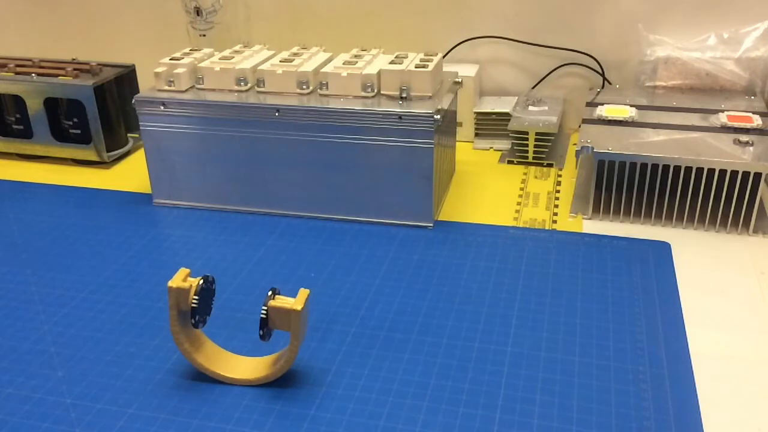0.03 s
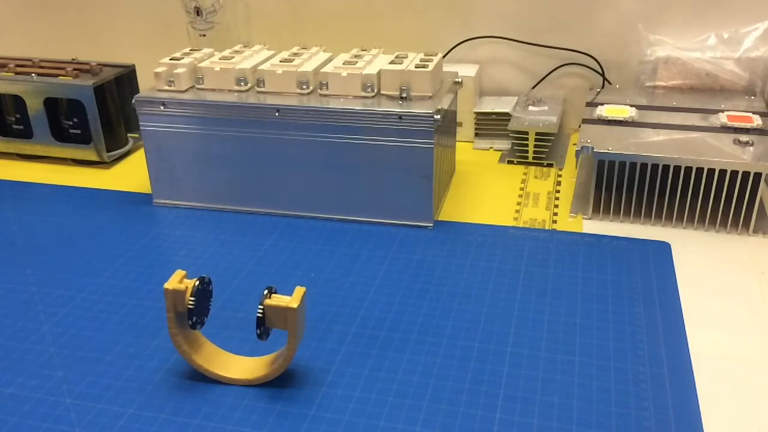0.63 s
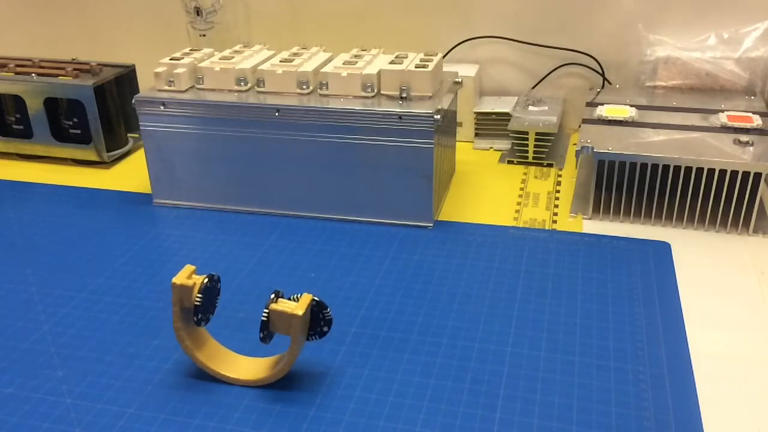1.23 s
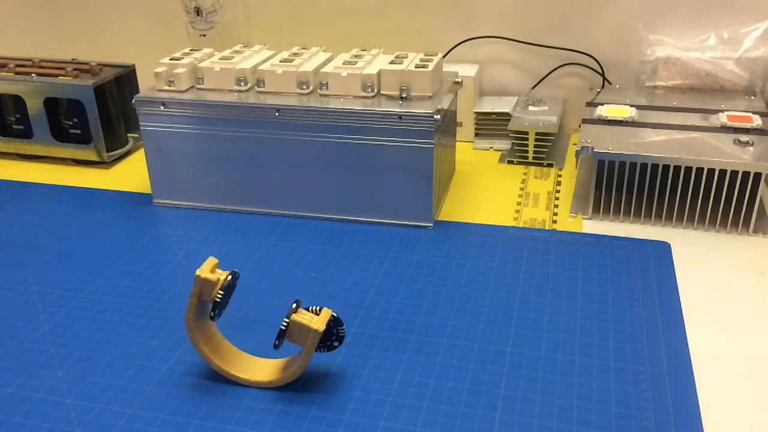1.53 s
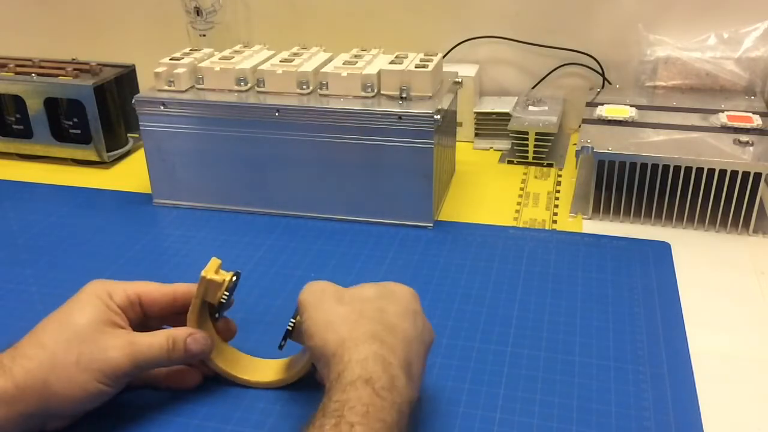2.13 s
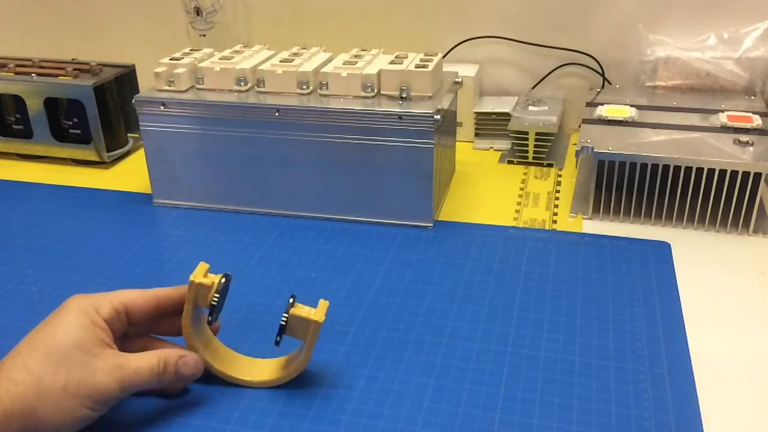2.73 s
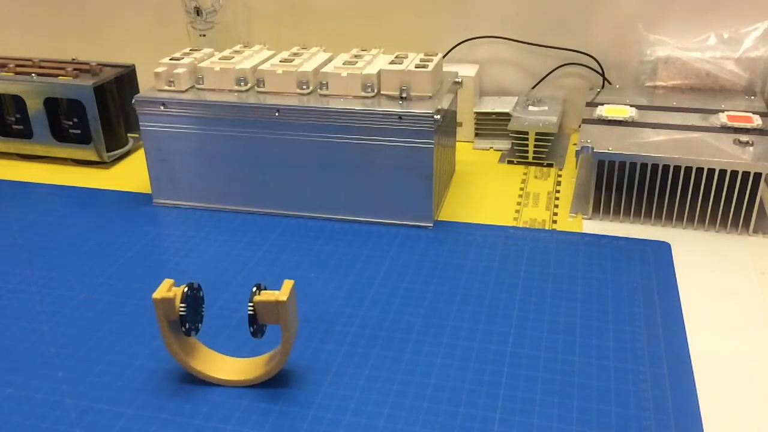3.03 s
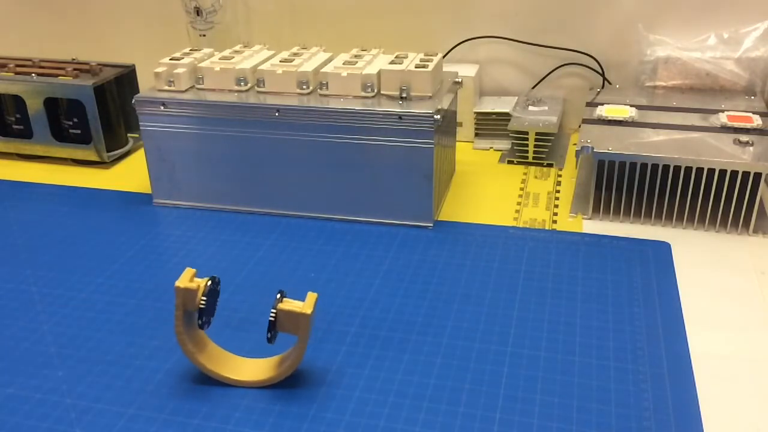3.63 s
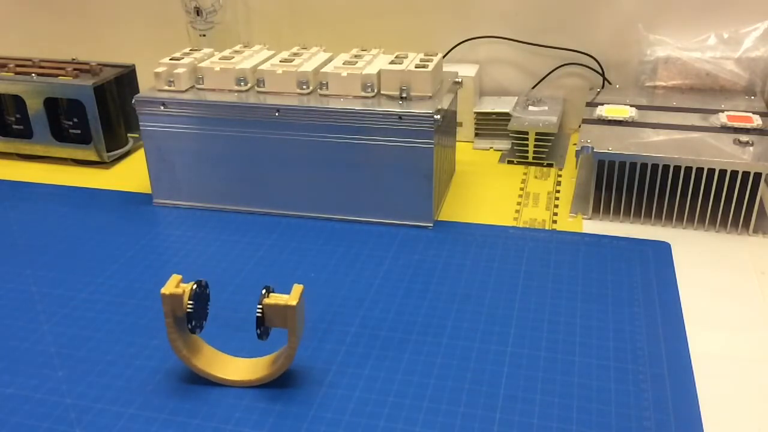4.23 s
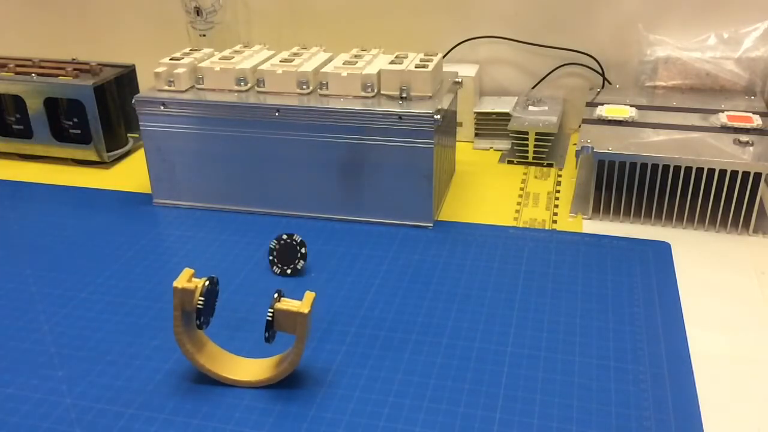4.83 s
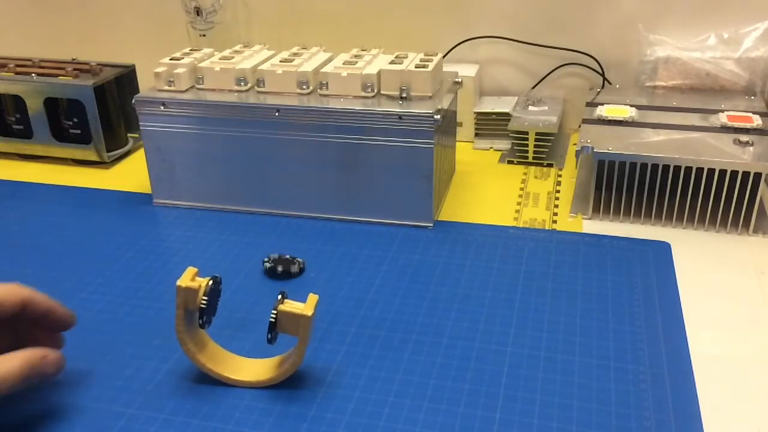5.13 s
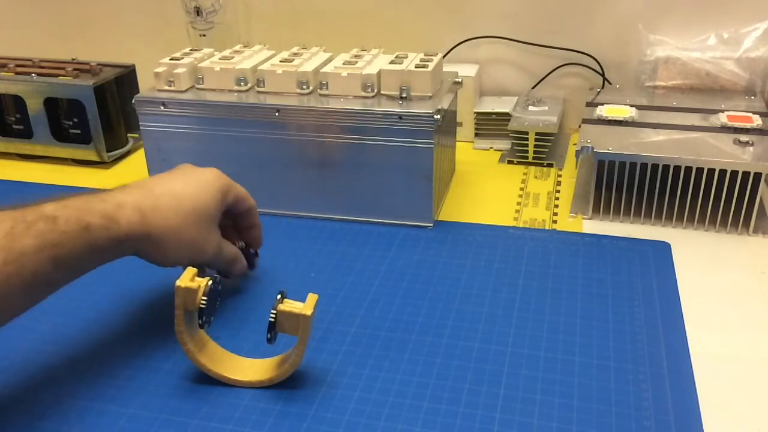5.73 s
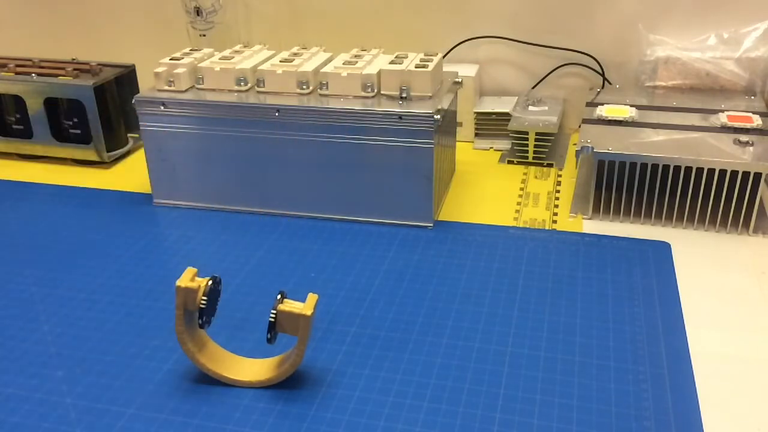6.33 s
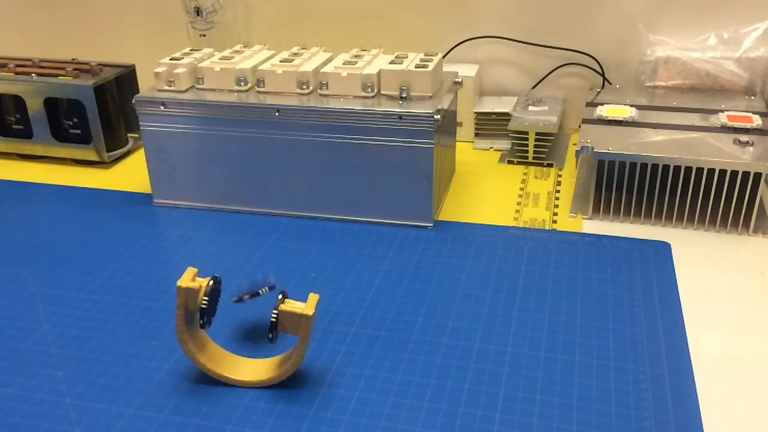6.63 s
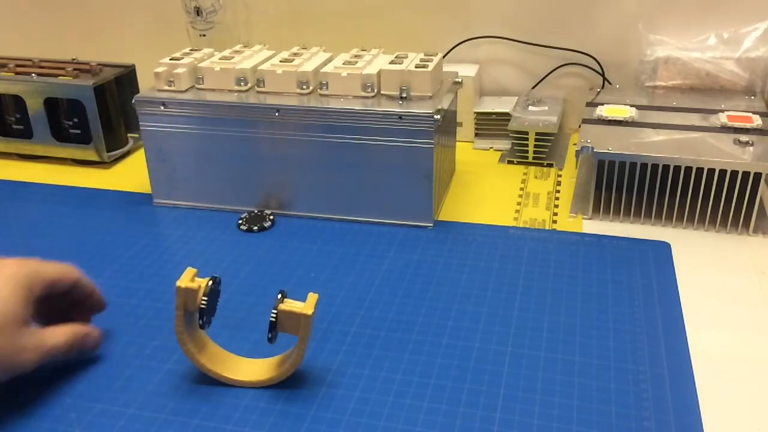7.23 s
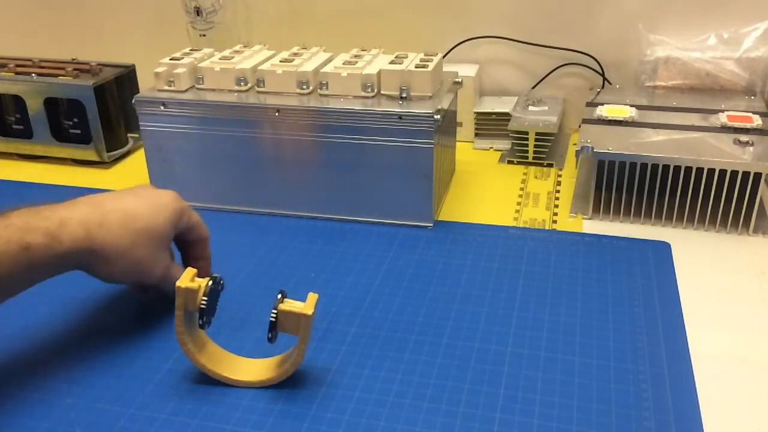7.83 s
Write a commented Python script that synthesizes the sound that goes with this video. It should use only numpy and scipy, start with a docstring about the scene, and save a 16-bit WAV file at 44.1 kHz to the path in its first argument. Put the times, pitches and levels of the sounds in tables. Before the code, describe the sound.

A faint electric buzz and hum fill a small room, heard from close to a workbench. At about 1 second a hard plastic chip cracks against a magnet, its holder knocks on the bench, and the chip chatters quickly before snapping on with a tiny ping. Soft sleeve rustles come near 1.9 and 2.9 seconds, with a couple of light, dull bumps between them. At 4.7 seconds a second chip clacks sharply, bounces and wobbles like a coin on the mat, its rim ticking faster until a click and knock at about 5.6. At 6.7 seconds a third chip cracks against the magnet with a brief ping, bounces with loud knocks and strikes a metal case near 7 seconds, which rings shortly. The chip wobbles and taps the case again more lightly, then slides quietly over the mat from about 7.7 seconds.

```python
"""Sharp clacks, knocks and wobbles over a faint electric buzz, in a small room.
Poker chips, tossed at a strong magnet in a curved plastic holder, crack against it and rock the
holder on the bench. They bounce and wobble like coins on the bench mat; one rings a metal case.
Sleeves rustle softly as hands fetch the chips back."""
import sys
import numpy as np
from scipy import signal
from scipy.fft import irfft
from scipy.io import wavfile
from scipy.ndimage import uniform_filter1d, minimum_filter1d

SR = 44100
rng = np.random.default_rng(int(sys.argv[2]) if len(sys.argv) > 2 else 0)


def persist_wave(psi):
    """Save psi, clipped to +-1, as 16-bit WAV."""
    counts = np.round(np.clip(psi, -1, 1) * 32767).astype(np.int16)
    wavfile.write(sys.argv[1], SR, np.atleast_2d(counts).T)


N = 348390
TIME_S = np.arange(N) / SR
RING_S = TIME_S[:SR * 3 // 4]  # time axis of one decay

# Table levels are relative; each source adds its own gain.
CHIP_MODES = [(1424, -7.5, 0.034), (3105, -6, 0.031), (3190, 3, 0.013), (3470, -4, 0.039),
              (5930, -21, 0.057)]  # disc: f/Hz, level/dB, t60/s
BENCH_MODES = [(104, -5, .14), (124, -9, .12), (171.2, -6, .16), (235, -4, .06), (295.2, -1, .08),
               (344, -.5, .1), (385, 1.5, .08)]  # bench top: f/Hz, level/dB, t60/s
RIM_TICK_SPECTRUM = [(200, -19.5), (1500, 10.5), (3700, -10), (5200, -4.5), (6800, -15.5), (8500, -31.5),
                     (15000, -38.5)]  # rim catching on the mat: f/Hz, level/dB


def amp(db):
    """Decibels to gain."""
    return 10 ** (np.asarray(db) / 20)


def unit(x):
    """Scale to energy 1."""
    return x / np.sqrt(np.sum(x ** 2) + 1e-20)


def lookup(points, hz):
    """Interpolate a table over log frequency."""
    table_hz, value = np.transpose(points)
    return np.interp(np.log(hz + 1), np.log(table_hz), value)


def add(mix, s, sound):
    """Mix a sound in at time s."""
    part = mix[round(s * SR):][:len(sound)]
    part += sound[:len(part)]


def pulse(spectrum, tilt_db_oct=0, cut_hz=SR, order=5, size=4096):
    """Minimum-phase click; a soft contact cuts the treble down to a faint tick."""
    hz = abs(np.fft.fftfreq(size, 1 / SR))
    lowpass = 1 / np.hypot(1, (hz / cut_hz) ** order) + amp(-28.5)
    treble_db = tilt_db_oct * np.log2(np.hypot(hz, 2500) / 4000)
    log_gain = np.log(lowpass * amp(lookup(spectrum, hz) + treble_db))
    return np.fft.ifft(np.exp(np.conj(signal.hilbert(log_gain)))).real[:size // 2]


def colour(x, spectrum):
    """Filter by a spectrum, keeping the power of white noise."""
    return signal.oaconvolve(x, unit(pulse(spectrum)))[:len(x)]


def ring(modes, detune=0., uneven_db=0.):
    """Decaying modes; each blow lands on another spot and weights them anew."""
    out = np.zeros(len(RING_S))
    for k, (hz, db, t60_s) in enumerate(modes):
        weight, shift = rng.standard_normal(2)
        envelope = amp(db + uneven_db * weight - 60 * RING_S / t60_s)
        out += (-1) ** k * envelope * np.sin(2 * np.pi * hz * (1 + detune * shift) * RING_S)
    return out


def scatter(start_s, t60_s):
    """Dense decaying reflections, energy 1."""
    return unit(rng.standard_normal(len(RING_S)) * amp(-60 * RING_S / t60_s) * (RING_S > start_s))


def room_tail():
    """Diffuse echoes, each band decaying at its own rate."""
    decay = [(100, 0.34), (1500, 0.26), (4000, 0.25), (7000, 0.25), (12000, 0.059)]  # reverberation: f/Hz, t60/s
    hz, s, noise = signal.stft(rng.standard_normal(len(RING_S)), SR, nperseg=256)
    envelope = amp(-60 * s / lookup(decay, hz)[:, None])
    tail = signal.istft(noise * envelope, SR, nperseg=256)[1][:len(RING_S)]
    return unit(tail * np.clip((RING_S - .005) / .0032, 0, 1))


def space(room_db, near_db, near_t60_s):
    """Direct sound, quick echoes from gear on the bench, then the room."""
    near = amp(near_db) * scatter(.00027, near_t60_s)
    return signal.unit_impulse(len(RING_S)) + near + amp(room_db) * room_tail()


def swells(rows):
    """Sum of Gaussian envelopes."""
    return sum(amp(db) * np.exp(-.5 * ((TIME_S - s) / sigma_s) ** 2) for s, sigma_s, db in rows)


def grains(per_s, spread_db):
    """Tiny random slips of uneven size, rms 1."""
    size = amp(spread_db * np.minimum(rng.exponential(1, N), 3)) * rng.choice([-1, 1], N)
    return np.sqrt(N) * unit(size * (rng.random(N) < per_s / SR))


def click_train(first_s, period_s, jitter_s, uneven_db):
    """Nearly regular clicks of uneven size, rms 1."""
    out, s = np.zeros(N), np.arange(first_s, N / SR, period_s)
    late, size = rng.standard_normal((len(s), 2)).T
    out[np.clip((s + jitter_s * late) * SR, 0, N - 1).astype(int)] = amp(uneven_db * size)
    return np.sqrt(N) * unit(out)


def background():
    """Room air, mains hum, a sizzling power supply and the faint tick of a wireless beacon."""
    air_spectrum = [(20, -7.5), (55, 11.5), (130, 9.5), (500, -0.5), (900, -5.5), (2000, -7.5),
                    (4500, -4.5), (8000, -14), (15500, -18)]  # f/Hz, level/dB
    hum_partials = [(59.2, -75), (118.4, -80.5)]  # f/Hz, rms level/dB
    buzz_spectrum = [(500, -30.5), (2100, -21), (2700, -8.5), (3040, 2), (3300, -4), (6000, -22.5),
                     (12000, -31.5)]  # f/Hz, level/dB
    tick_spectrum = [(500, -17), (2500, -7), (4200, 6), (6500, -6.5), (15000, -20)]  # f/Hz, level/dB
    air = amp(-70.5) * colour(rng.standard_normal(N), air_spectrum)
    hum = sum(amp(db) * np.sqrt(2) * np.sin(2 * np.pi * hz * TIME_S) for hz, db in hum_partials)
    sparks = click_train(first_s=0, period_s=1 / 240, jitter_s=.0005, uneven_db=1.4)
    sparks *= 1 + .56 * np.cos(2 * np.pi * 120 * TIME_S)  # alternately strong and weak
    buzz = colour(amp(-70) * sparks + amp(-78) * rng.standard_normal(N), buzz_spectrum)
    beacon = click_train(first_s=.0558, period_s=.1024, jitter_s=0, uneven_db=2.6)
    return air + hum + buzz + amp(-77) * colour(beacon, tick_spectrum)


def contacts(s, db, tilt_db_oct, edge_lead_s):
    """A tilted chip touches edge first, slaps flat, then chatters; a nearly flat one only slaps."""
    slap = (s, db, tilt_db_oct)
    if edge_lead_s < .003:
        return [slap]
    dull_db_oct = tilt_db_oct - 4
    edge = (s - edge_lead_s, db - 10.5, dull_db_oct)
    chatter = (s + .0026, db - 1, dull_db_oct)
    return [slap, edge, chatter]


def clacks():
    """A chip hits the magnet or bench: a hard crack and the short ring of the disc."""
    hits = [(1.0091, 4.5, -5.5, -33.5, 0.0029), (1.0308, -10, -5, -34, 0), (1.2452, 1.5, 5, -50, 0),
            (4.6796, 10, 1, -37, .0083), (4.6893, 1.5, 0, -33, 0), (5.5661, 0.5, 4.5, -61, 0.00028),
            (6.6784, 12, -1, -52.5, 0.01), (6.8412, 0, 3, -53, 0.0046)]  # t/s, level/dB, treble tilt/(dB/oct), disc ring/dB, edge lead/s
    crack_spectrum = [(60, -26.5), (300, -10), (900, -10.5), (1450, -1), (2100, -6), (3400, 3.5),
                      (4000, -3), (6000, -5.5), (7200, -12.5), (9200, -27), (11300, -25.5), (15500, -43)]  # f/Hz, level/dB
    out = np.zeros(N)
    for slap_s, slap_db, slap_db_oct, ring_db, edge_lead_s in hits:
        for s, db, tilt_db_oct in contacts(slap_s, slap_db, slap_db_oct, edge_lead_s):
            blow = amp(ring_db) * ring(CHIP_MODES, detune=.0041, uneven_db=3)
            add(blow, 0, pulse(crack_spectrum, tilt_db_oct))
            path = space(room_db=-7, near_db=4.5, near_t60_s=.02025)
            add(out, s, amp(db - 4) * signal.fftconvolve(blow, path))
    return out


def thud(db, cut_hz):
    """Low modes of the bench top; a slow push leaves out the higher ones."""
    excited = [(hz, mode_db - 10 * np.log10(1 + (hz / cut_hz) ** 6), t60_s)
               for hz, mode_db, t60_s in BENCH_MODES]
    push = 1 - np.exp(-RING_S * cut_hz)
    return amp(db) * push * ring(excited, detune=.035, uneven_db=1.5)


def holder_thuds(rock_back_s=.01697):
    """Each jolt of the holder shakes the bench twice: the push, then the softer rock back."""
    jolts = [(1.0090, -29, 553), (1.049, -35, 400), (2.3520, -37.5, 156.5), (2.4430, -45.5, 201),
             (4.6810, -29, 430), (4.7270, -36, 443), (6.6810, -30, 320)]  # t/s, level/dB, push cut-off/Hz
    out = np.zeros(N)
    for s, db, cut_hz in jolts:
        add(out, s, thud(db, cut_hz))
        add(out, s + rock_back_s, thud(db - 4, cut_hz / 2))
    return out


def bending_wave(centre_hz=680, sigma_oct=.42):
    """A blow disperses through the bench top: highs arrive first, lows milliseconds later."""
    hz = np.fft.rfftfreq(len(RING_S), 1 / SR)
    band = np.exp(-.5 * (np.log2((hz + 1) / centre_hz) / sigma_oct) ** 2)
    group_delay_s = .0075 * np.sqrt(centre_hz / (hz + 1))
    return irfft(band * np.exp(-4j * np.pi * hz * group_delay_s), len(RING_S))


def knocks():
    """Damped landings of chips and holder send a wave through the bench and briefly ring it."""
    landings = [(1.0471, 25.5, 4000, -11.5), (2.3500, -17, 1520, -8.5), (2.441, -19, 1470, -11),
                (4.691, 5, 1900, -14), (4.726, 20.5, 3300, -12.5), (4.7970, 11.5, 3300, -13),
                (4.8392, 0, 3500, -15), (4.9892, 4, 3300, -17), (5.567, 11, 5950, -14),
                (6.6915, 12, 2320, -26), (6.8413, 22.5, 2700, -15), (6.8867, 12.5, 2900, -10),
                (7.2890, 3.5, 3870, -7), (7.3852, -2, 6500, -6), (7.634, -16.5, 2660, -12)]  # t/s, level/dB, contact cut-off/Hz, room/dB
    knock_spectrum = [(50, -27.5), (200, -20.5), (370, -1.5), (620, -6), (880, 2.5), (1200, -1), (1550, 2),
                      (2300, -.5), (3300, -2), (4000, -6), (5500, -4.5), (8500, -17.5), (15500, -30)]  # f/Hz, level/dB
    mat_modes = [(341.2, -1, 0.082), (487, 1.5, 0.17), (700, -2, 0.033), (905, -1.5, .05)]  # bench under the mat: f/Hz, level/dB, t60/s
    out = np.zeros(N)
    for s, db, cut_hz, room_db in landings:
        path = space(room_db, near_db=-2.5, near_t60_s=.022) + amp(-2) * bending_wave()
        path += amp(-52) * ring(mat_modes, detune=.038, uneven_db=3.5)
        knock = signal.fftconvolve(pulse(knock_spectrum, cut_hz=cut_hz), path)
        add(knock, 0, amp(-66) * ring(BENCH_MODES, detune=.019))
        add(out, s, amp(db - 6) * knock)
    return out


def chatters():
    """Chip on chip: quick, ringing touches as one is caught by the magnet or pulled off."""
    touches = [(1.0477, 8, -11), (1.159, -11.5, -10), (1.1696, -8, -7), (1.1759, -12, -2),
               (1.1851, -12, -10), (1.1900, -2.5, 5), (1.1931, 0, 0.5), (2.2796, -28, -3.5)]  # t/s, level/dB, treble tilt/(dB/oct)
    touch_spectrum = [(900, -17), (1430, 0), (1800, -14), (2700, -3), (3250, 6.5), (3600, 6), (4000, -11),
                      (5200, -13.5), (6000, -10.5), (8800, -31), (12000, -22.5), (15500, -43)]  # f/Hz, level/dB
    out = np.zeros(N)
    for s, db, tilt_db_oct in touches:
        touch = amp(-31) * ring(CHIP_MODES, detune=.01, uneven_db=4.5)
        add(touch, 0, unit(pulse(touch_spectrum, tilt_db_oct)))
        path = unit(space(room_db=-10.5, near_db=1, near_t60_s=.019))
        add(out, s, amp(db) * signal.fftconvolve(touch, path))
    return out


def magnet_pings():
    """A snap rings the magnet itself: a short metallic ping, drawn out and blurred by the room."""
    snaps = [(1.2442, -26, 4350, .09), (6.6801, -21, 4190, .3)]  # t/s, level/dB, pitch/Hz, echo t60/s
    magnet_modes = [(.62, -10.5, .025), (1, 0.5, 0.025), (1.62, -14.5, .02)]  # f/pitch, level/dB, t60/s
    out = np.zeros(N)
    for s, db, pitch_hz, echo_t60_s in snaps:
        tone = ring([(ratio * pitch_hz, mode_db, t60_s) for ratio, mode_db, t60_s in magnet_modes])
        path = unit(.5 * signal.unit_impulse(len(RING_S)) + scatter(0, echo_t60_s))
        add(out, s, amp(db) * signal.fftconvolve(tone, path))
    return out


def sleeves():
    """Cloth brushes as the arms reach in and out."""
    swishes = [(1.862, 0.056, -58.5), (2.12, 0.095, -67), (2.922, 0.084, -57.5)]  # t/s, sigma/s, level/dB
    cloth_spectrum = [(300, -20), (600, -6.5), (4300, 3), (8500, -16), (12500, -17), (15500, -23)]  # f/Hz, level/dB
    return colour(swells(swishes) * rng.standard_normal(N), cloth_spectrum)


def wobble_sweeps(max_turns=10, first_sigma_s=.01, shortening_s=.00966):
    """As a wobbling chip lies flatter, turns quicken and each sweep spreads the same energy wider."""
    spins = [(4.871, 5.60, .127, -36.5, 0.00066), (7.065, 7.47, 0.1249, -37.5, 0.0053)]  # start/s, end/s, first turn/s, level/dB, sigma growth per turn/s
    sweeps = []
    for s, end_s, first_turn_s, db, widening_s in spins:
        for turn in range(max_turns):
            sigma_s = first_sigma_s + turn * widening_s
            if s < end_s:
                sweeps.append((s, sigma_s, db - 10 * np.log10(sigma_s / first_sigma_s)))
            s += first_turn_s - turn * shortening_s
    return swells(sweeps)


def wobbles():
    """A chip's rim rolls over the mat once a turn, crackling with fine slips."""
    roll_spectrum = [(100, -45), (250, -23), (370, -1), (520, -6), (720, 1), (1250, 0.5), (1570, 5.5),
                     (1850, -6), (2600, -7.5), (3900, -38), (5300, -23), (7600, -48), (14000, -58.5)]  # f/Hz, level/dB
    pressure = wobble_sweeps()
    rolling = colour(pressure * grains(per_s=1600, spread_db=3.1), roll_spectrum)
    crackle = colour(pressure * grains(per_s=130, spread_db=-.5), RIM_TICK_SPECTRUM)
    return rolling + amp(-13) * crackle


def rim_ticks():
    """The notched rim of a wobbling chip catches on the mat, each time at another spot."""
    catches = [(4.875, -16.5), (5.0970, -17.5), (5.1928, -21), (5.2166, -15.5), (5.3214, -11.5),
               (5.3371, -13), (5.4032, -14), (5.4133, -11.5), (5.4680, -23), (5.4825, -13), (5.5365, -17),
               (5.558, -10.5), (7.0627, -13.5), (7.1654, -14.5), (7.3180, -11)]  # t/s, level/dB
    tick = unit(pulse(RIM_TICK_SPECTRUM))
    out = np.zeros(N)
    for s, db in catches:
        path = unit(space(room_db=-7.5, near_db=-2.5, near_t60_s=.013))
        add(out, s, amp(db) * signal.fftconvolve(tick, path))
    return out


def metal_case():
    """A chip strikes the case, which rings on over the quickly dying clank of its panels."""
    hits = [(6.9676, 17.5), (6.9756, -2), (7.2690, -1), (7.61, -13)]  # t/s, level/dB
    case_modes = [(1102, 2, 0.11), (1178, -5.5, .34), (1206, -5, .42), (1335, 2, 0.6), (1876, -4.5, 0.16),
                  (1896, -12.5, 0.39), (2929, -5, 0.095), (2984, -0.5, 0.12), (3210, 0, .14),
                  (3460, -8, 0.099)]  # f/Hz, level/dB, t60/s
    strike_spectrum = [(100, -29), (400, -5), (900, 3.5), (1400, 10), (2200, 2.5), (3400, 6), (4200, -8.5),
                       (6300, -9), (15500, -51.5)]  # f/Hz, level/dB
    damped_modes = [(hz, db, .07) for hz, db, _ in case_modes]
    out = np.zeros(N)
    for s, db in hits:
        tone = ring(case_modes)
        clank = amp(-2.5) * ring(damped_modes, detune=.06)
        path = space(room_db=-12, near_db=-5, near_t60_s=.031)
        echo = amp(-11.5) * signal.fftconvolve(tone, room_tail())[:len(tone)]
        add(out, s, amp(db - 9.5) * signal.fftconvolve(pulse(strike_spectrum), path))
        add(out, s, amp(db - 41) * (tone + clank + echo))
    return out


def slide():
    """A chip drags over the mat in dense tiny slips."""
    drag_envelope = [(7.69, -69), (7.74, -51), (7.80, -51.5), (7.90, -53)]  # t/s, level/dB
    slide_spectrum = [(250, -22), (850, 4), (1200, -7), (1620, 5.5), (2100, -8), (3400, -3), (12000, -36)]  # f/Hz, level/dB
    s, db = np.transpose(drag_envelope)
    pressure = amp(np.interp(TIME_S, s, db, left=-np.inf))
    return colour(pressure * grains(per_s=4600, spread_db=1.7), slide_spectrum)


def scene():
    """All sources at one microphone."""
    impacts = clacks() + chatters() + magnet_pings() + knocks() + holder_thuds()
    impacts += metal_case() + rim_ticks()
    friction = wobbles() + slide()
    rustle = sleeves()
    mat_path = unit(space(room_db=-11.5, near_db=-9.5, near_t60_s=.0095))
    return (impacts + rustle + signal.oaconvolve(friction, mat_path)[:N] + background())[None]


def record(dry):
    """Brief silence, fade-in, fast peak limiter, low-pass."""
    silence_s, fade_s, ceiling, cut_hz = .1, .023, .7, 15500
    opened = dry * np.clip((TIME_S - silence_s) / fade_s, 0, 1)
    gain = ceiling / np.maximum(abs(opened), ceiling)
    limited = opened * uniform_filter1d(minimum_filter1d(gain, size=45), size=45)
    lowpass = signal.firwin(255, cut_hz, window=("kaiser", 9), fs=SR)
    return signal.oaconvolve(limited, lowpass[None], "same")


dry = scene()
out = record(dry)
persist_wave(out)
```